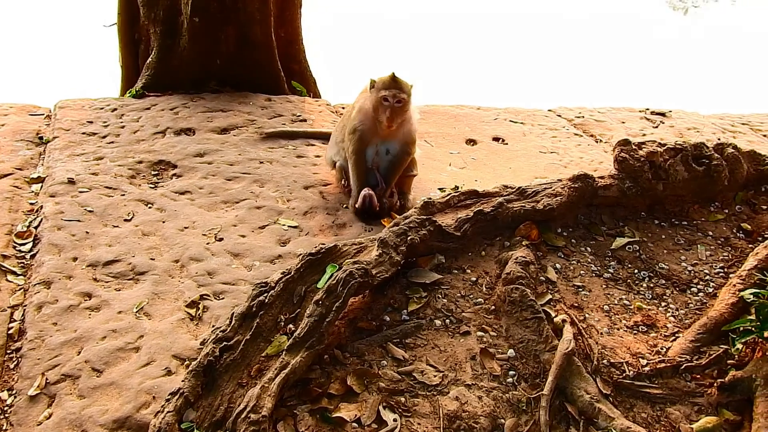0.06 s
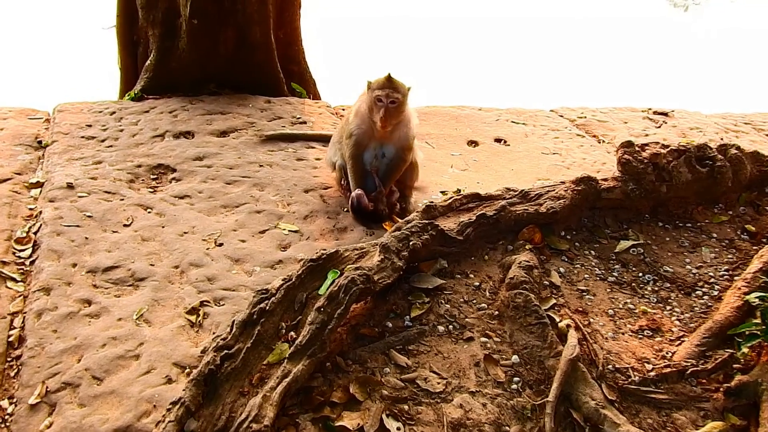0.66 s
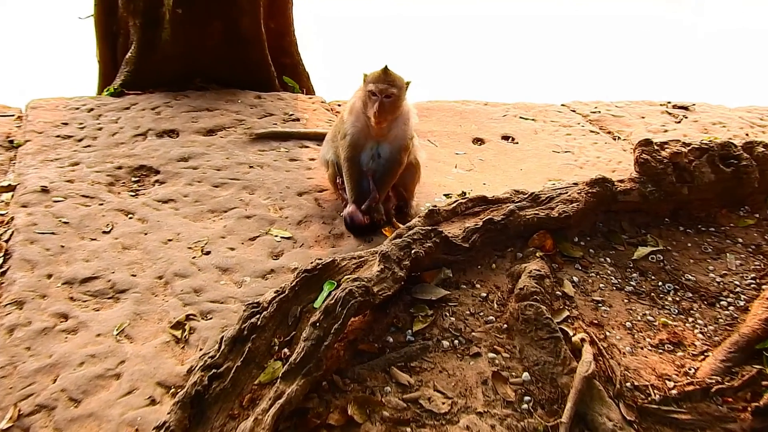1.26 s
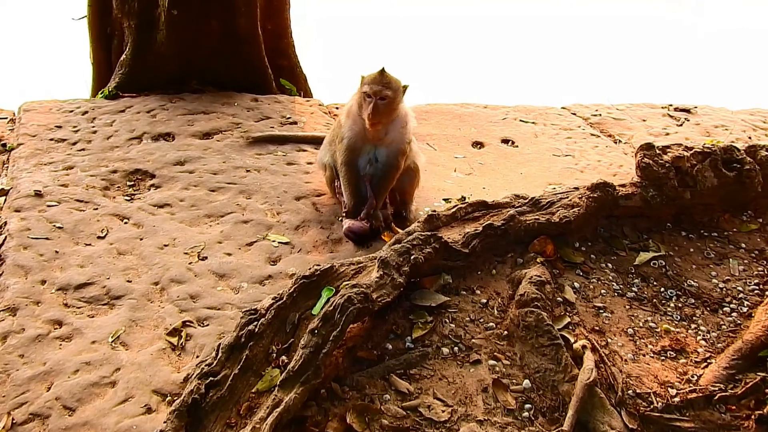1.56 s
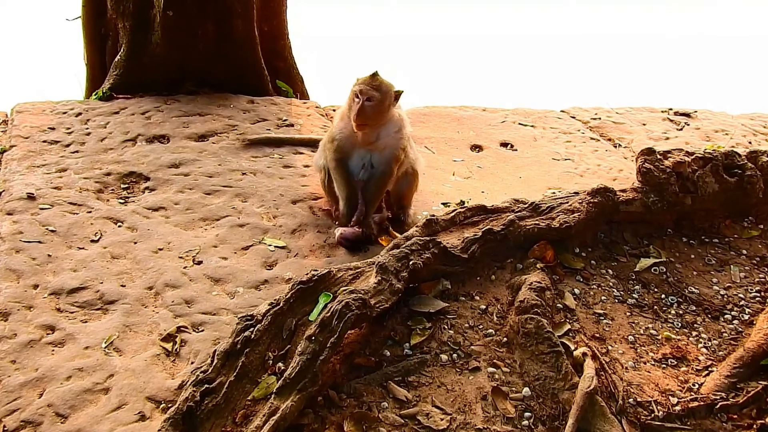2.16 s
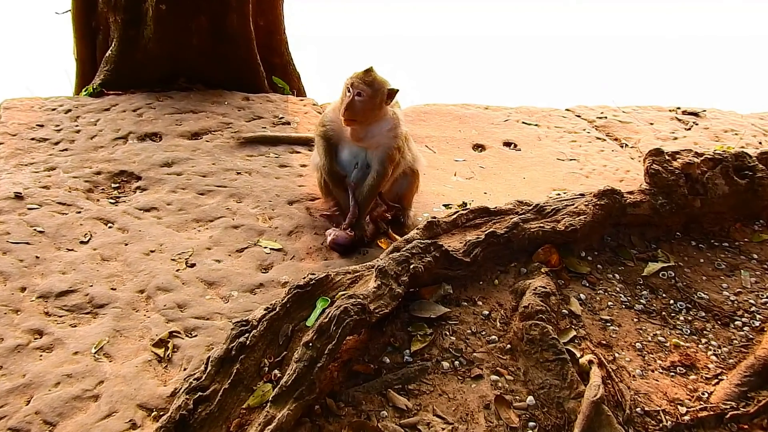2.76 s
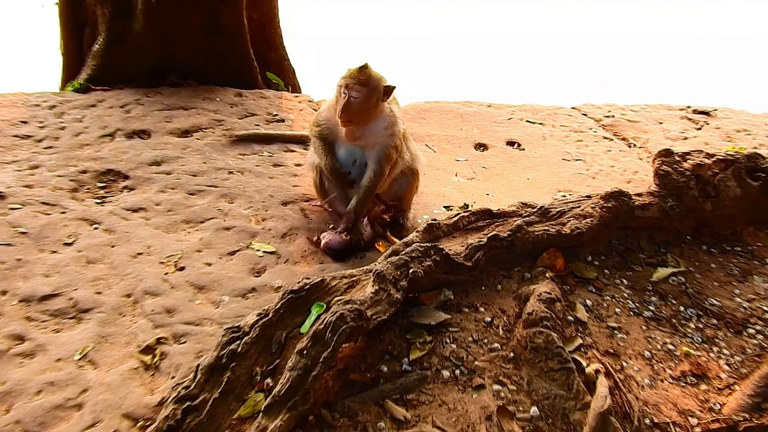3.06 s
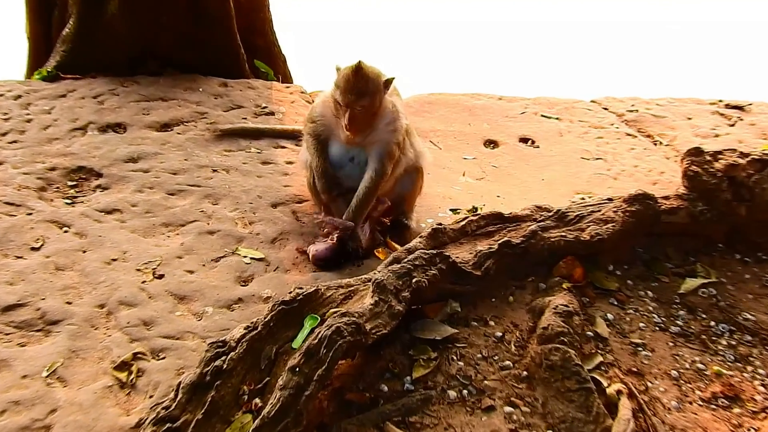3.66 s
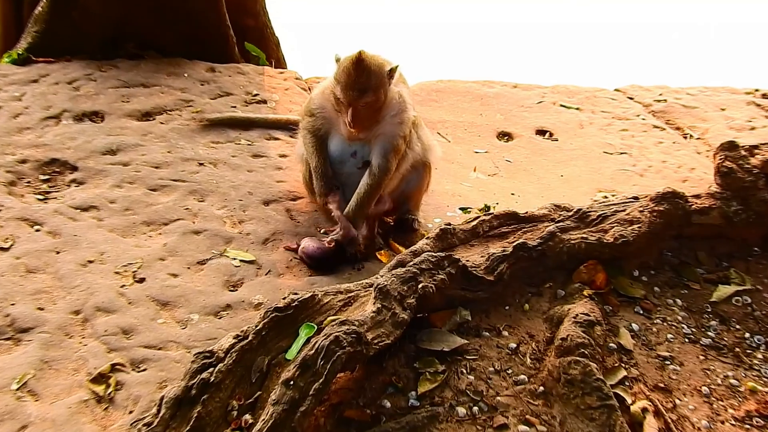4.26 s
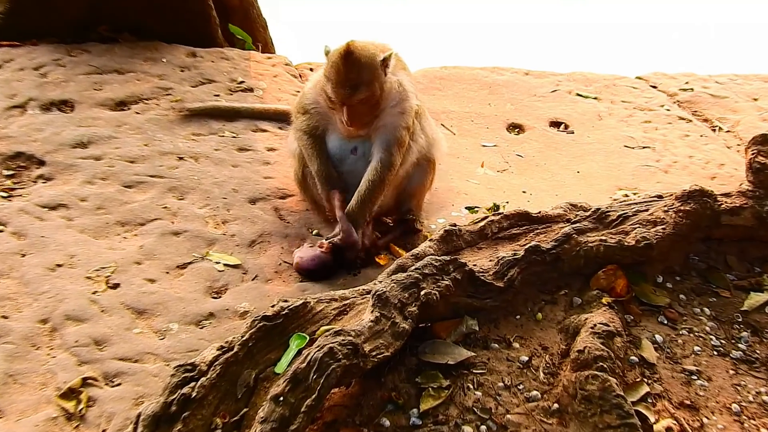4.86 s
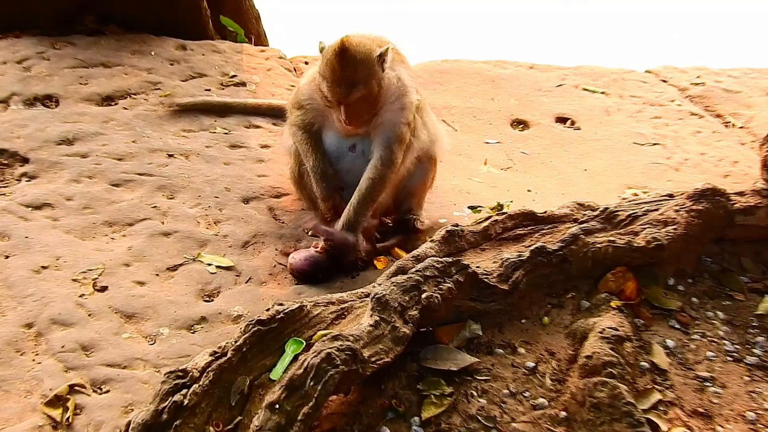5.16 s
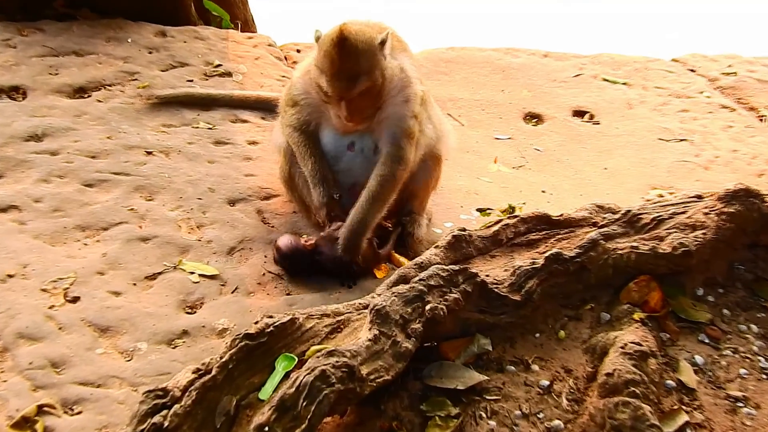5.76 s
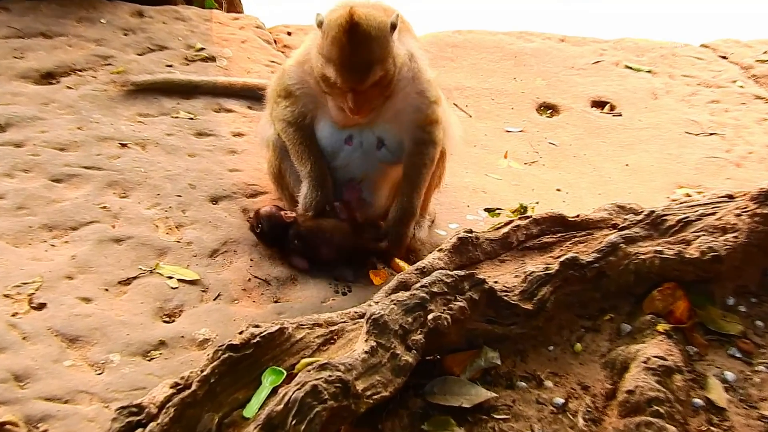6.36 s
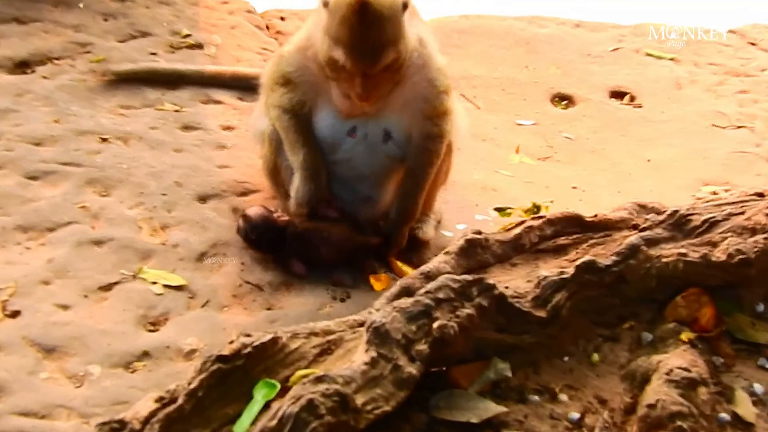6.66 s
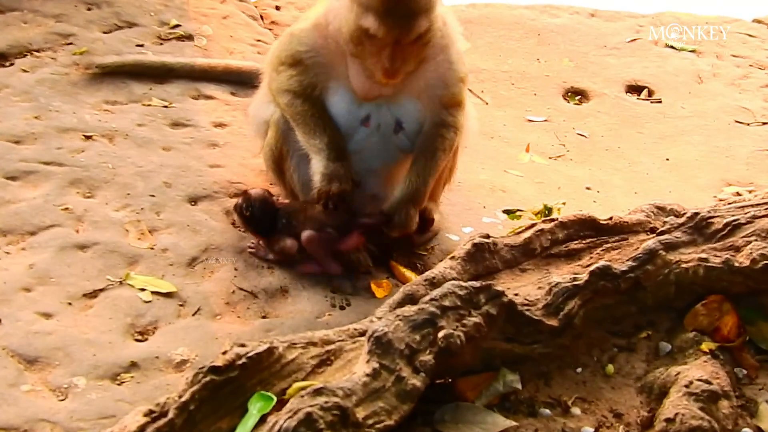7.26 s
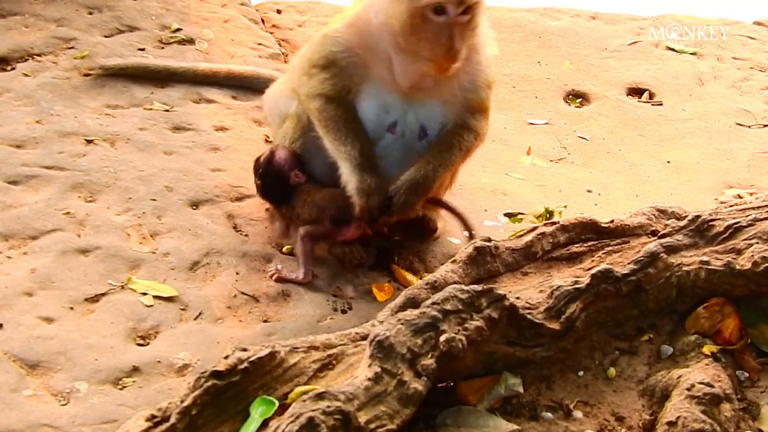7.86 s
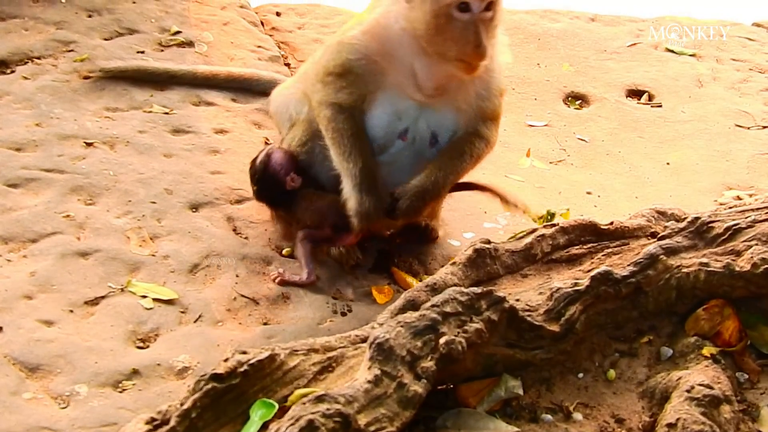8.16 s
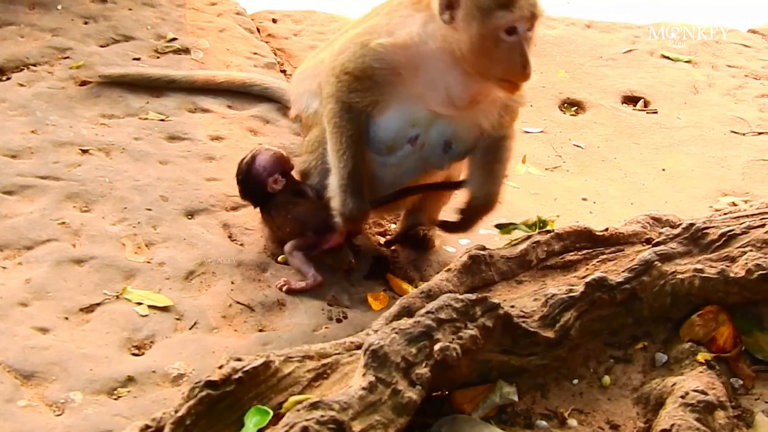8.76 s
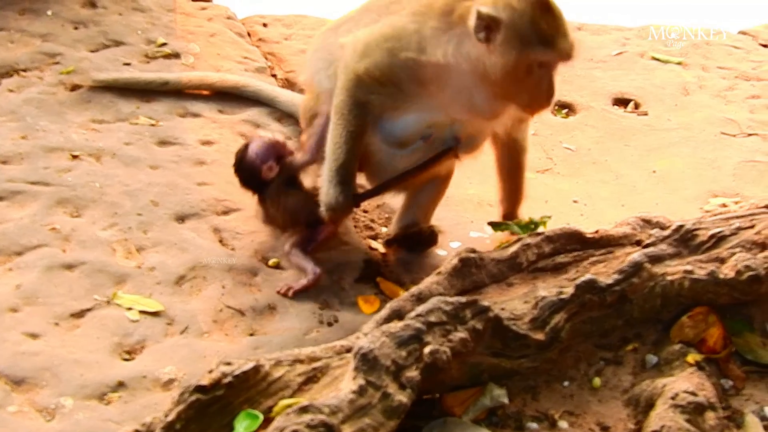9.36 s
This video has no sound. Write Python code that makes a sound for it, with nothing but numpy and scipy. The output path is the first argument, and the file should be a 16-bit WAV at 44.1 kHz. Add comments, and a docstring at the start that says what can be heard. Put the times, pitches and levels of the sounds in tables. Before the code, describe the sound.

A baby monkey cries in shrill, wavering squeals that break into harsh rasps, over a low outdoor rumble.

```python
"""On stone ground under trees, a newborn monkey cries while an adult handles it.
Its vocal folds make each squeal: a thin rising whistle that breaks into a harsh rasp as they slap
unevenly, and often falls away as a whistle again. Some cries start from a low throaty squawk.
The cries echo off the stone and ring on in the trees, over a low outdoor rumble and a few soft scuffs."""
import sys
import numpy as np
from scipy import signal
from scipy.fft import rfft, irfft, next_fast_len
from scipy.io import wavfile
from scipy.ndimage import uniform_filter1d

SR = 44100
rng = np.random.default_rng(int(sys.argv[2]) if len(sys.argv) > 2 else 0)


def digitize_waveform(pressure):
    """Quantize a signal to 16-bit integers and store it at the path in sys.argv[1].

    Rows of a 2-D input are taken as channels; values are limited to [-1, 1].
    """
    field = np.atleast_2d(pressure).T
    bounded = np.clip(field, -1, 1)
    quanta = np.round(bounded * 32767).astype(np.int16)
    wavfile.write(sys.argv[1], SR, quanta)


N = 423801

# Tone of the background, a low outdoor rumble with a very faint, even hiss on top: f/Hz, level/dB
BACKGROUND_TONE = [(22, -6), (42, 3.5), (57, -3), (72, -7), (130, -21), (320, -21), (520, -24.5),
                   (1260, -26.5), (2050, -23), (2550, -41), (3200, -47.5), (4800, -60), (7000, -63.5)]
# How alike the background is in both ears: f/Hz, likeness (1 = the same, 0 = unrelated)
BACKGROUND_LIKENESS = [(60, 0.97), (140, 0.89), (330, 0.77), (780, 0.74), (1840, 0.061), (4320, -0.08)]
# The animals rubbing on the ground: t/s, length/s, level/dB, centre f/Hz
SCUFFS = [(4.355, 0.84, -49, 654), (5.042, .3, -45, 590), (6.584, .11, -41.5, 270), (7.48, 0.305, -52, 293)]
# How long the trees take to fade by 60 dB: f/Hz, ring time/s
TREE_RING_TIMES = [(500, 0.45), (1400, 1.15), (2300, 1.05), (3700, 0.85), (4700, 0.5)]
# How the tight throat boosts or weakens squeals and rasps: f/Hz, gain/dB
TIGHT_THROAT = [(300, -24), (900, -13.5), (1160, -16.5), (1400, 2), (3800, -0.5), (4500, -7.5),
                (5200, -14.5), (6100, -19), (7200, -36)]
# Low throaty notes: t/s, length/s, rise/s, level/dB, level change after the rise/dB, f/Hz, roughness/0-1
SQUAWKS = [(6.231, .035, 0.0051, -38.5, -16, 1211, 0.22), (7.321, 0.046, 0.034, -39, -2, 1014, 0.8),
           (7.36, .05, 0.012, -30, -8, 1348, 0.3), (7.405, .115, 0.012, -38, -5, 1193, 0.5),
           (7.507, 0.083, 0.017, -28, 3, 1371, 0.31), (7.584, .11, 0.011, -27.5, -8, 1292, 0.39),
           (7.818, .11, 0.092, -27, 1.5, 2342, 0.2), (7.921, 0.054, 0.007, -22, -3.5, 2490, 0.17),
           (7.979, 0.067, 0.02, -28, -10.5, 2274, .35), (8.097, 0.088, 0.022, -25.5, -7.5, 2900, 0.44),
           (8.831, 0.063, 0.0067, -38, 4.5, 1155, 0.31), (8.867, 0.12, 0.0058, -24, -7.5, 1293, 0.19)]
# Bursts where the voice breaks: t/s, length/s, rise/s, level/dB, level change after the rise/dB,
# middle ring against low ring/dB, fizz/dB, how far the whistle tears/0-1
RASPS = [ (0.734, 0.24, 0.065, -24, -1, -0.5, -19, 0.97), (0.938, .14, .03, -21.5, -7.5, -3.5, -41, 0.65),
         (1.75, 0.023, 0.0078, -48, -1, 7, 5, 0.19), (2.57, 0.067, 0.065, -43.5, 11.5, -3.5, -8.5, 0.6),
         (2.622, 0.089, 0.028, -28.5, -8, 19.5, -23, 0.84), (2.713, .11, 0.028, -50, -4.5, 17.5, -24, 0.9),
         (3.535, 0.064, .02, -43.5, -9, -3.5, -13, 0.25), (3.645, 0.19, 0.027, -35, -4.5, -2, -12.5, 0.6),
         (3.81, .07, 0.021, -21, -8, 4.5, -21, 1), (3.864, .07, 0.0047, -35, 1.5, 7.5, -11, 0.5),
         (4.421, .11, 0.034, -31, -12.5, 2.5, -15, 0.2), (4.772, .15, .06, -37, -5, 2.5, -9.5, 0.55),
         (4.9, .15, .04, -35.5, -5.5, 3, -10, .6), (5.065, 0.16, 0.07, -36, -9.5, 9.5, -29, 1),
         (6.265, .14, 0.011, -36, -9.5, -1.5, -18.5, .15), (6.378, .38, 0.041, -45.5, 1.5, 2, -22.5, 0.12),
         (6.794, .12, 0.032, -30.5, 1.5, 3, -18.5, 1), (6.893, .125, 0.058, -27.5, -11, 5.5, -27, 0.94),
         (7.362, .14, 0.0073, -45.5, -2, -1, -18.5, 0), (7.51, .19, 0.035, -28, -1.5, 4.5, -15, 0.78),
         (7.697, 0.061, .01, -39, -8, 5.5, -11, 0.6), (7.969, 0.082, 0.027, -39.5, -9, 15, -11.5, .8),
         (8.098, .12, 0.0094, -35, -8, 17.5, -15.5, 0.6), (8.873, 0.031, 0.0088, -19, -9.5, 14, -27, 0.04),
         (8.903, .105, 0.0063, -27, -11, -6, -41, 0)]
# A second, slower vibration of the vocal folds: start t/s, end t/s, f/Hz, depth/0-1
FLUTTERS = [(3.37, 3.42, 543, 0.35), (4.67, 4.75, 850, 0.38), (5.46, 5.57, 1870, 0.22),
            (6.31, 6.74, 1085, 0.55), (7.69, 7.97, 1120, 0.7), (9.455, 9.53, 895, 0.36)]
# The whistle's path before the throat shapes it, one list of points a squeal: t/s, f/Hz, level/dB
SQUEAL_PATHS = [
    [(.587, 3020, -31), (.63, 3200, -35.5), (.66, 3600, -32), (.70, 3937, -38.5), (.77, 3085, -27),
     (.87, 3360, -32.5), (.95, 2920, -27), (1.0, 2390, -43)],
    [(1.703, 3057, -40.5), (1.749, 2864, -37), (1.758, 2260, -33.5), (1.772, 1805, -49)],
    [(2.427, 3060, -32.5), (2.49, 3600, -32), (2.56, 4213, -40), (2.68, 3800, -32), (2.8, 3273, -31.5),
     (2.845, 2206, -27.5)],
    [(3.321, 2983, -35.5), (3.385, 3330, -31.5), (3.44, 3890, -39), (3.51, 4200, -36.5),
     (3.65, 4340, -38.5), (3.76, 3803, -35), (3.86, 3350, -33.5), (3.925, 3106, -28), (3.962, 2400, -32)],
    [(4.425, 1360, -36.5), (4.51, 3350, -32), (4.63, 4131, -39.5), (4.675, 3620, -32), (4.74, 3620, -35.5),
     (4.89, 3623, -40.5), (4.93, 3447, -32.5), (5.04, 3693, -35), (5.1, 3177, -27.5), (5.18, 3500, -40),
     (5.27, 3687, -32), (5.32, 3437, -27.5), (5.39, 3607, -38), (5.44, 3944, -33.5), (5.57, 3366, -34),
     (5.625, 2017, -33)],
    [(6.268, 1900, -32.5), (6.32, 2967, -35), (6.37, 3252, -36.5), (6.55, 3380, -43.5), (6.63, 3657, -39),
     (6.71, 3645, -39.5), (6.79, 4200, -40), (6.86, 2923, -30), (6.98, 2670, -37.5)],
    [(7.53, 2720, -39), (7.62, 2869, -34), (7.72, 3230, -37.5), (7.815, 3600, -34), (7.89, 3267, -36),
     (7.96, 3450, -39), (8.02, 3080, -33), (8.075, 3900, -39), (8.16, 3560, -39), (8.215, 3235, -32),
     (8.253, 2072, -22.5)],
    [(9.455, 2826, -33.5), (9.485, 3227, -29.5), (9.575, 3806, -35.5), (9.62, 3750, -25)],
]


def gain_of(db):
    """Turns decibels into a number to multiply by."""
    return 10 ** (np.asarray(db) / 20)


def unit_level(x):
    """Scales a signal to an average power of 1."""
    return x / np.sqrt(np.mean(x ** 2) + 1e-20)


def look_up(points, hz):
    """Reads between a table's points along straight lines on a pitch scale."""
    f, value = np.transpose(points)
    return np.interp(np.log(hz + 1), np.log(f + 1), value)


def add(mix, start, sound):
    """Mixes a sound in at a time in seconds."""
    part = mix[max(round(start * SR), 0):][:len(sound)]
    part += sound[:len(part)]


def shape_tone(x, points):
    """Filters x by a table of f/Hz, gain/dB."""
    size = next_fast_len(N + SR // 4, True)
    gains = gain_of(look_up(points, np.fft.rfftfreq(size, 1 / SR)))
    return irfft(rfft(x, size) * gains, size)[..., :N]


def wander(count, hz):
    """A smooth random wobble of typical size 1, mostly slower than hz."""
    noise = rng.standard_normal(count + SR // 16)
    return unit_level(signal.lfilter(*signal.butter(2, hz, fs=SR), noise)[-count:])


def resonate(x, hz, width_hz, order=2):
    """Lets through a band around hz, which may be steady or gliding."""
    turn = np.exp(2j * np.pi * np.cumsum(hz * np.ones(len(x))) / SR)
    lowpass = signal.butter(order, width_hz / 2, fs=SR, output="sos")
    return 2 * (turn * signal.sosfilt(lowpass, x / turn)).real


def background(level_db=-39.5):
    """A low outdoor rumble, nearly the same in both ears, with a very faint, even hiss on top."""
    size = next_fast_len(N, True)
    left, unrelated = rfft(rng.standard_normal((2, size)))
    likeness = np.clip(look_up(BACKGROUND_LIKENESS, np.fft.rfftfreq(size, 1 / SR)), -1, 1)
    right = likeness * left + np.sqrt(1 - likeness ** 2) * unrelated
    noise = unit_level(shape_tone(irfft(np.array([left, right]))[:, :N], BACKGROUND_TONE))
    return gain_of(level_db + wander(N, 6.8)) * noise * gain_of([[-.6], [.6]])


def scuffs():
    """Dull, grainy rubs of fur and hands on stone."""
    out = np.zeros(N)
    for start, length, level_db, hz in SCUFFS:
        count = int(length * SR)
        grains = rng.standard_normal(count) * np.exp(.5 * wander(count, 50))
        rub = unit_level(resonate(grains, hz, 1.13 * hz))
        add(out, start, gain_of(level_db) * rub * signal.windows.tukey(count, .6))
    return out


def echoes(x, ring_scale, delay_s, alike_below_hz):
    """Countless small echoes from trunks, leaves and stone, each band fading at its own speed."""
    hz, t, noise = signal.stft(rng.standard_normal((3, SR)), SR, nperseg=256)
    likeness = 1 / (1 + (hz[:, None] / alike_below_hz) ** 4)  # long waves reach both ears alike
    ears = np.sqrt(likeness) * noise[0] + np.sqrt(1 - likeness) * noise[1:]
    ring_s = ring_scale * look_up(TREE_RING_TIMES, hz)[:, None]
    tail = signal.istft(ears * gain_of(-60 * t / ring_s), SR, nperseg=256)[1]
    tail = np.pad(tail / np.linalg.norm(tail[0]), ((0, 0), (int(delay_s * SR), 0)))
    return signal.fftconvolve(x[None], tail, axes=1)[:, :N]


def fading_cry():
    """An earlier cry still rings in the trees at the start: the echo of a short, shrill burst."""
    cry, count = np.zeros(N), SR // 50
    burst = resonate(rng.standard_normal(count), 2840, 1800, order=6) * np.hanning(count)
    add(cry, 0, gain_of(-38) * unit_level(burst))
    return echoes(cry, ring_scale=.8, delay_s=0, alike_below_hz=1500)


def breath(length, rise, change_db, release_s=.011):
    """One push of air: it rises, slowly sags or grows, then stops quickly."""
    t = np.arange(0, length, 1 / SR)
    attack = np.sin(np.pi / 2 * np.clip(t / rise, 0, 1)) ** 2
    slope = gain_of(change_db * np.maximum(t - rise, 0) / max(length - rise, 1e-3))
    return t, attack * slope * np.clip((length - t) / release_s, 0, 1)


def fold_slaps(count, slaps_per_s=200, unevenness=.3, closing=.75, leak=.08):
    """The vocal folds slap together unevenly, and each slap lets a puff of air through."""
    cycles = np.cumsum(slaps_per_s * np.exp(unevenness * wander(count, 120))) / SR
    slaps = np.diff(np.floor(cycles), prepend=0)
    puffs = (leak + np.exp(-(cycles % 1) / closing)) * rng.standard_normal(count)
    return unit_level(slaps), unit_level(puffs)


def whistle(t, hz, rough, pitch_shake, level_shake, octave_db, hiss_db, snap_db, flutters=()):
    """The vocal folds make an almost pure tone; roughness shakes its pitch and strength and adds hiss."""
    shake = pitch_shake * rough * np.tanh(wander(len(t), 260)) + .006 * wander(len(t), 34.6)
    phase = 2 * np.pi * np.cumsum(uniform_filter1d(hz, 300) * (1 + shake)) / SR
    # The folds press hardest at the start, which adds the octave above to a clean note.
    pressed = np.clip(1 - 2 * rough, 0, 1) * np.exp(-(t - t[0]) / .14)
    tone = np.sin(phase) + gain_of(octave_db) * pressed * np.sin(2 * phase)
    for start, end, rate_hz, depth in flutters:  # unsteady side tones below and above the whistle
        beat = 2 * np.pi * np.cumsum(rate_hz * (1 + .054 * wander(len(t), 250))) / SR
        fade = np.clip(np.minimum(t - start, end - t) / .0048, 0, 1)
        below = np.sin(phase - beat) + .14 * np.sin(phase - 2 * beat)
        above = .5 * np.sin(phase + beat) + .27 * np.sin(phase + 2 * beat)
        hoarseness = 1 + np.tanh(.3 * wander(len(t), 90))
        tone += depth * fade * hoarseness * (below + depth * above)
    hiss = unit_level(resonate(rng.standard_normal(len(t)), .69 * hz, 1700, order=3))
    # The folds burst open with a snap.
    snap = gain_of(snap_db) * np.exp(-(t - t[0]) / .0077) * rng.standard_normal(len(t))
    strength = 1 + np.tanh(level_shake * rough * wander(len(t), 180))
    return unit_level(tone * strength) + gain_of(hiss_db) * rough * hiss + snap


def squawk(start, length, rise, level_db, change_db, hz, rough):
    """A low, rough note that slides up to its pitch."""
    t, push = breath(length, rise, change_db)
    pitch = hz * (1 - .1 * np.exp(-t / .015))  # starts a tenth too low
    tone = whistle(t, pitch, rough, pitch_shake=.18, level_shake=1.5,
                   octave_db=-20, hiss_db=-9.5, snap_db=-20)
    return start, gain_of(level_db) * push * tone


def rasp(start, length, rise, level_db, change_db, middle_db, fizz_db):
    """Slaps and puffs make the throat ring in a low and a middle band, with a high fizz on top."""
    t, push = breath(length, rise, change_db)
    slaps, puffs = fold_slaps(len(t))
    drive = puffs + 1.2 * slaps
    low = unit_level(resonate(drive, 1440 * (1 + .1 * wander(len(t), 17)), 570))
    middle = unit_level(resonate(drive, 1980 * (1 + .078 * wander(len(t), 23)), 520))
    ring = unit_level(low + gain_of(middle_db) * middle)
    fizz = push * unit_level(resonate(puffs, 4940, 1100, order=3))  # dies first as the push weakens
    return start, gain_of(level_db) * push * (ring + gain_of(fizz_db) * fizz)


def tearing(t, lead_s=.05, heal_s=.02):
    """How torn the whistle is, 0-1: it frays just before each rasp and clears as the rasp ends."""
    each = [tear * np.clip(np.minimum(1 + (t - start) / lead_s, (start + length - t) / heal_s), 0, 1)
            for start, length, *_, tear in RASPS]
    return np.clip(np.max(each, axis=0), 0, 1)


def squeal(path, clean_roughness=.07, tremble_db=1.4):
    """A trembling whistle; where it tears, part of it becomes a screech of puffs near the same pitch."""
    times, pitches, levels = np.transpose(path)
    t = np.arange(times[0], times[-1], 1 / SR)
    hz = np.interp(t, times, pitches) * (1 + .00813 * wander(len(t), hz=14))
    tear = tearing(t)
    rough = clean_roughness + (1 - clean_roughness) * tear
    tone = whistle(t, hz, rough, pitch_shake=.1151, level_shake=2.2,
                   octave_db=-14, hiss_db=-.5, snap_db=-4.5, flutters=FLUTTERS)
    _, puffs = fold_slaps(len(t))
    screech = unit_level(resonate(puffs, hz, width_hz=1150, order=3))
    screech_share = .6 * tear ** 2
    voice = np.sqrt(1 - screech_share) * tone + np.sqrt(screech_share) * screech
    edges = np.clip(np.minimum(t - t[0], t[-1] - t) / .00044, 0, 1)
    level_db = np.interp(t, times, levels) + tremble_db * wander(len(t), 25)
    return t[0], edges * gain_of(level_db) * voice


def baby_monkey():
    """All the cries: shrill ones shaped by the tight throat, and the duller open squawks."""
    shrill, throaty = np.zeros((2, N))
    for path in SQUEAL_PATHS:
        add(shrill, *squeal(path))
    for *row, _ in RASPS:
        add(shrill, *rasp(*row))
    for row in SQUAWKS:
        add(throaty, *squawk(*row))
    return shape_tone(shrill, TIGHT_THROAT) + shape_tone(throaty, [(4400, 1), (5800, -23.5)])


def scene():
    """The voice, quick echoes off the stone, the long ring of the trees, and the surroundings."""
    voice = gain_of(-1) * baby_monkey()
    direct = voice * gain_of([[-1.1], [-.1]])  # a little to the right
    stone = gain_of(-4.5) * echoes(voice, ring_scale=.28, delay_s=.001977, alike_below_hz=1920)
    trees = gain_of(-13.5) * echoes(voice, ring_scale=1, delay_s=.025, alike_below_hz=1500)
    return direct + stone + trees + fading_cry() + scuffs() + background()


def record(dry):
    """Rounds off the very loudest peaks, then cuts the highest treble."""
    ceiling, cutoff_hz = gain_of(-8.5), 7300
    rounded = dry / (1 + (dry / ceiling) ** 12) ** (1 / 12)
    lowpass = signal.firwin(511, cutoff_hz, window=("kaiser", 9), fs=SR)
    return signal.oaconvolve(rounded, lowpass[None], "same")


dry = scene()
out = record(dry)
digitize_waveform(out)
```